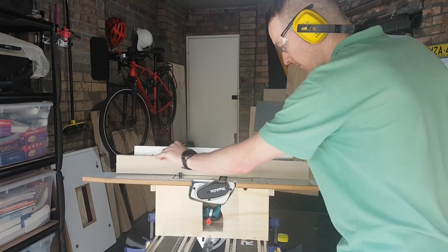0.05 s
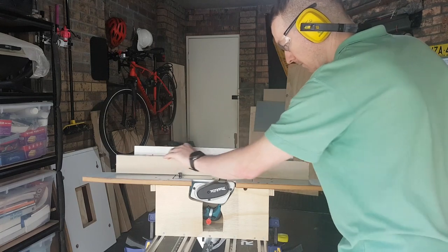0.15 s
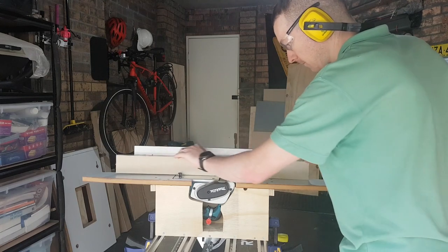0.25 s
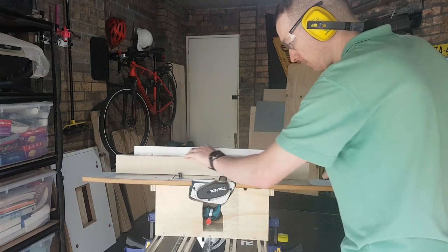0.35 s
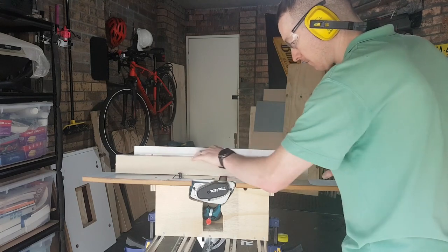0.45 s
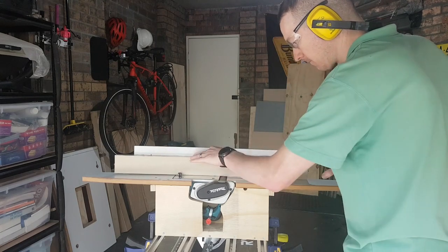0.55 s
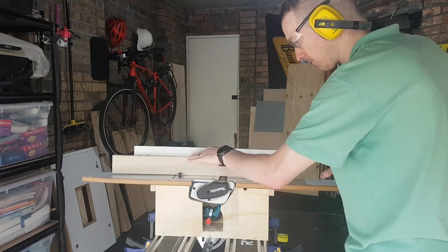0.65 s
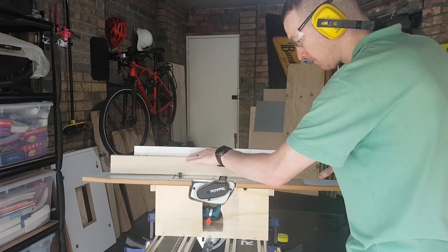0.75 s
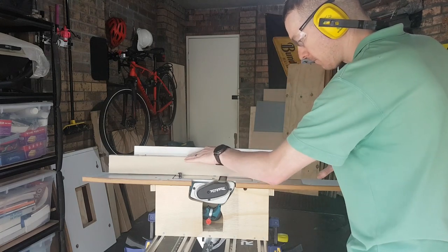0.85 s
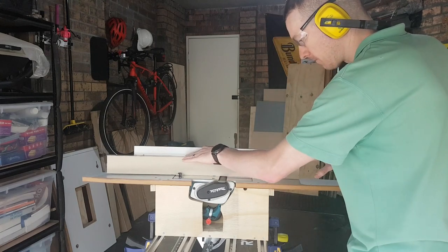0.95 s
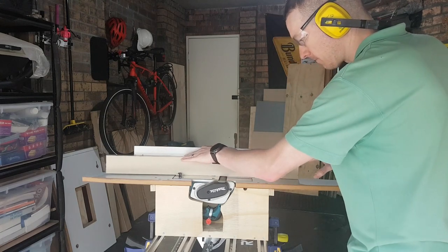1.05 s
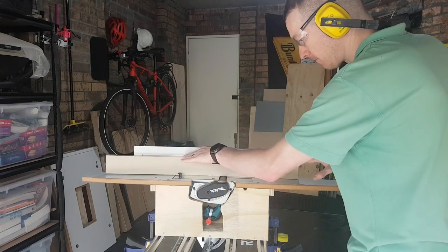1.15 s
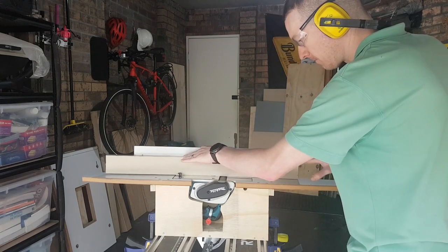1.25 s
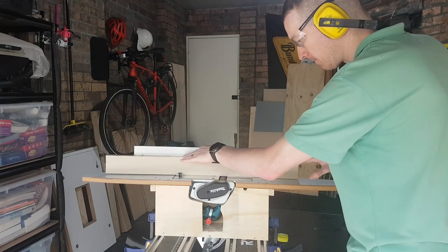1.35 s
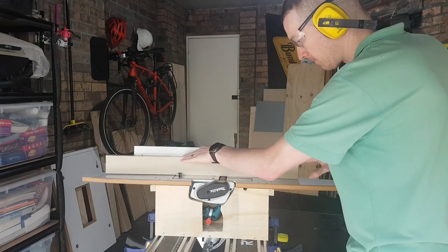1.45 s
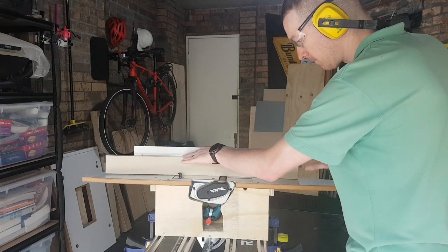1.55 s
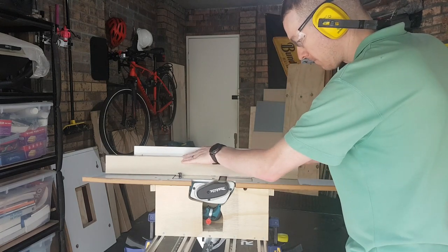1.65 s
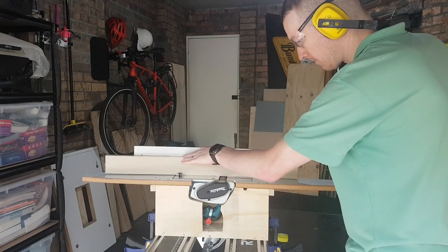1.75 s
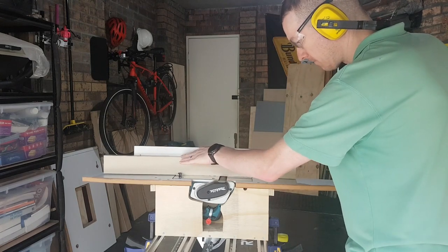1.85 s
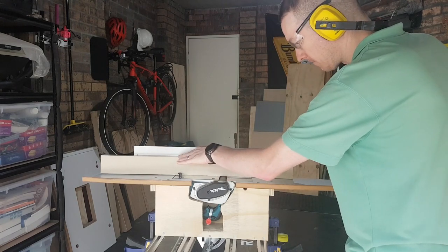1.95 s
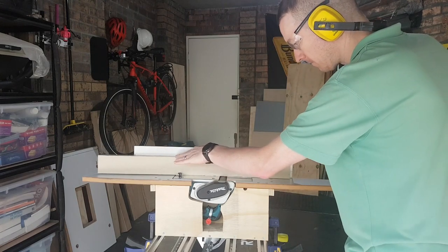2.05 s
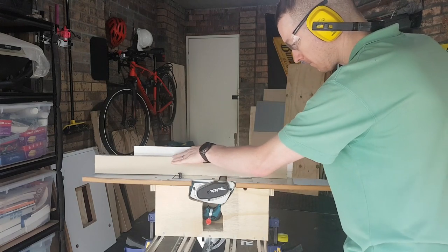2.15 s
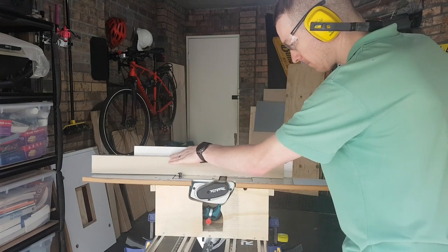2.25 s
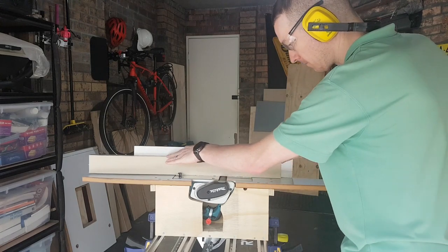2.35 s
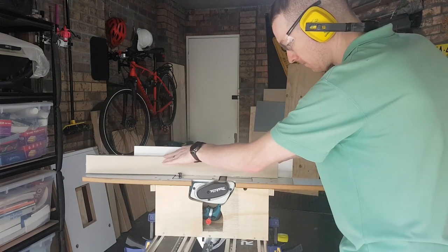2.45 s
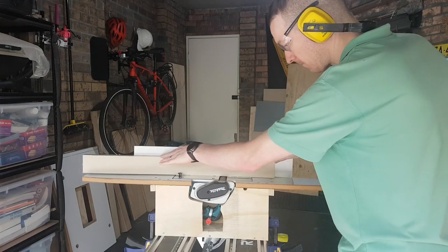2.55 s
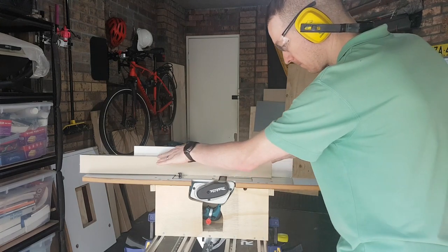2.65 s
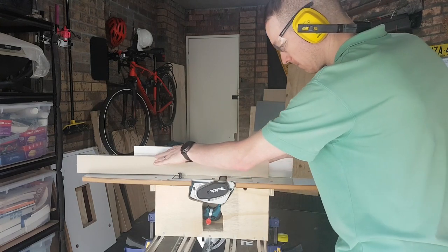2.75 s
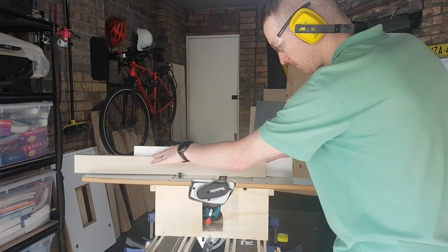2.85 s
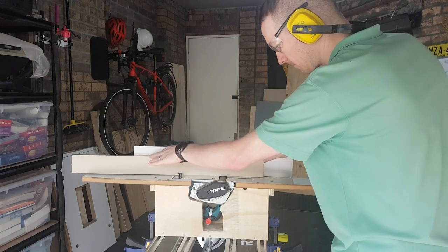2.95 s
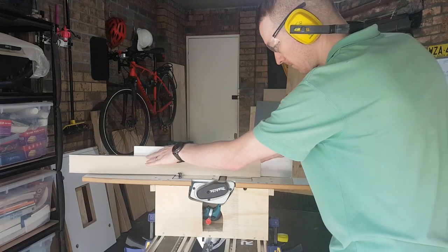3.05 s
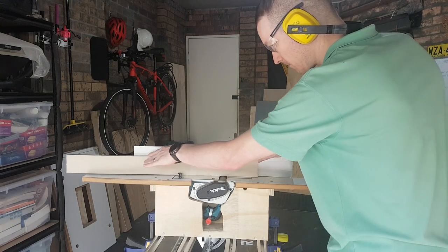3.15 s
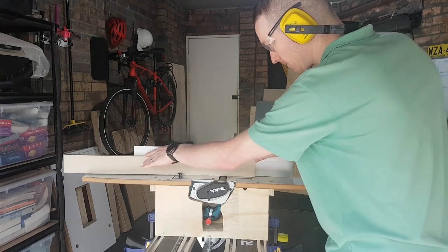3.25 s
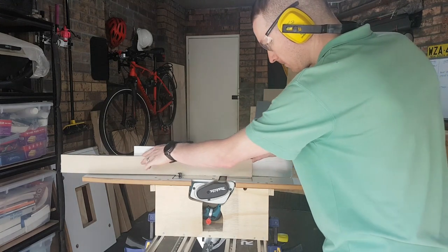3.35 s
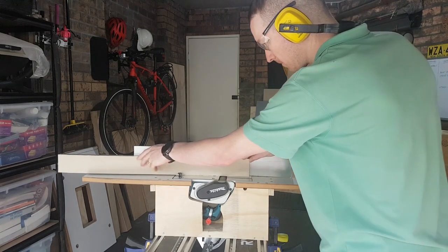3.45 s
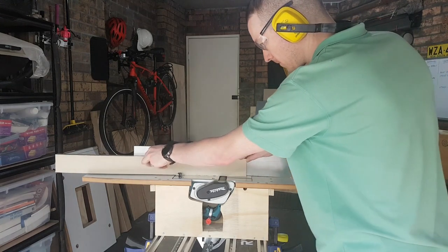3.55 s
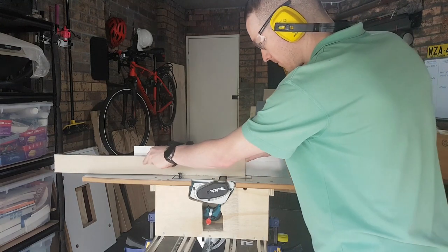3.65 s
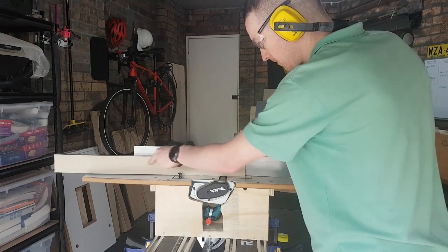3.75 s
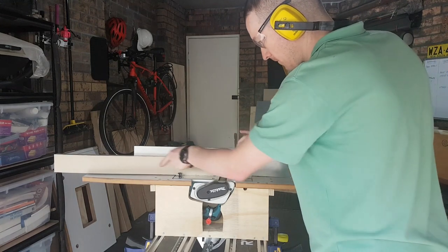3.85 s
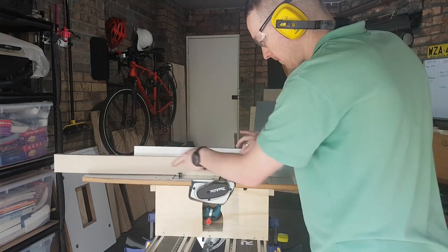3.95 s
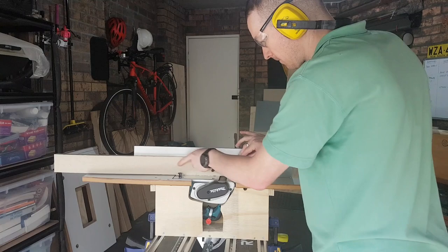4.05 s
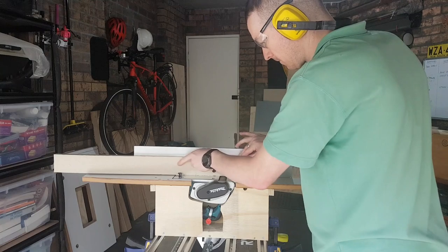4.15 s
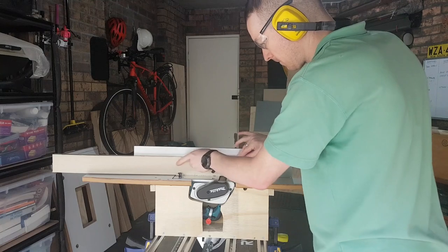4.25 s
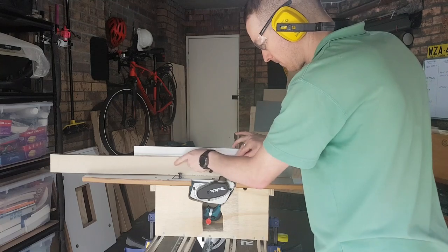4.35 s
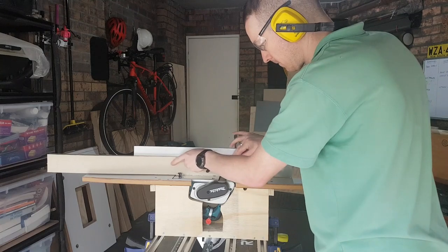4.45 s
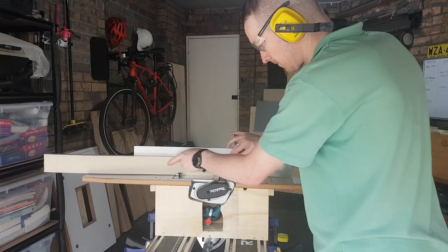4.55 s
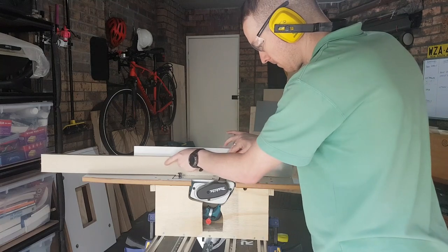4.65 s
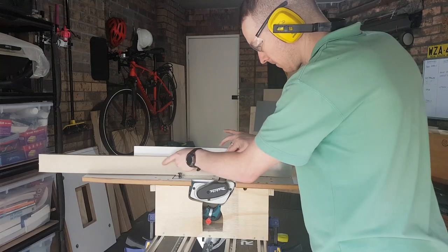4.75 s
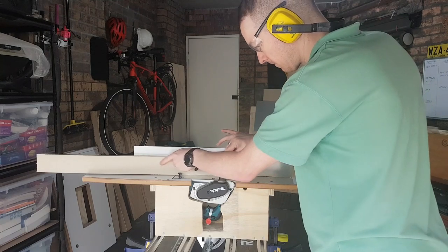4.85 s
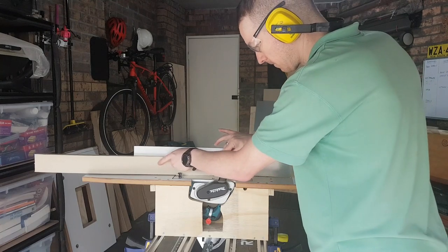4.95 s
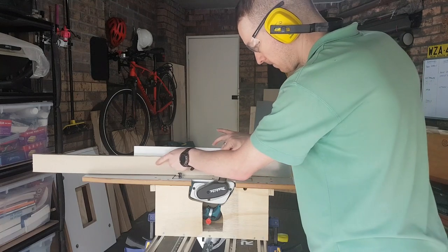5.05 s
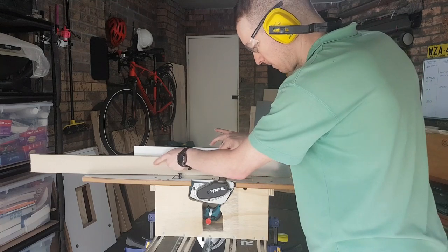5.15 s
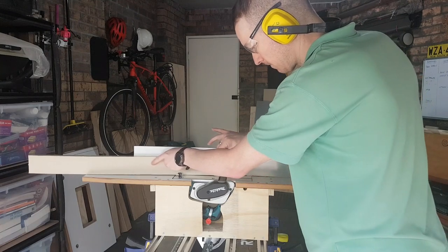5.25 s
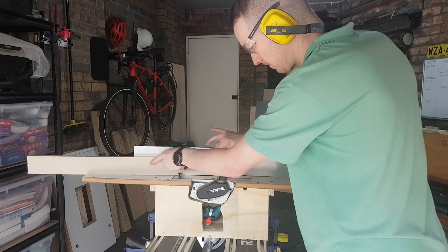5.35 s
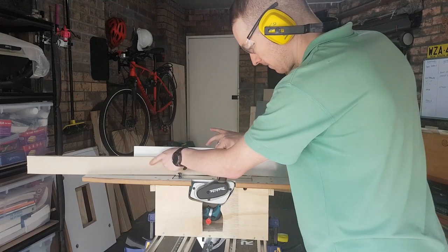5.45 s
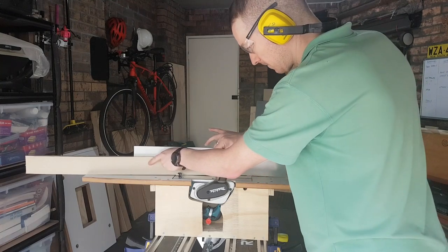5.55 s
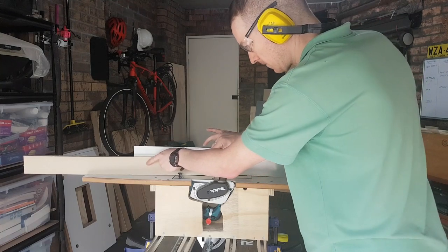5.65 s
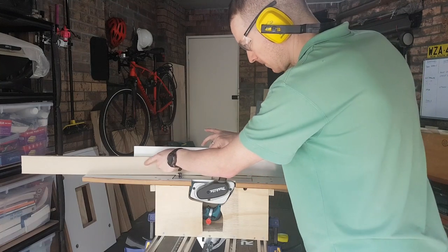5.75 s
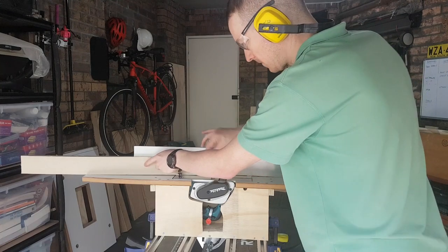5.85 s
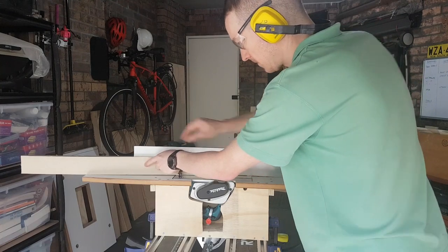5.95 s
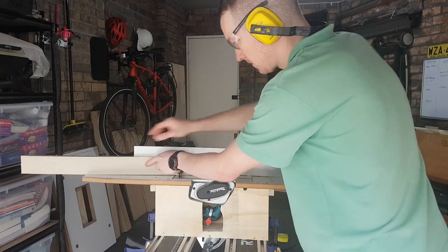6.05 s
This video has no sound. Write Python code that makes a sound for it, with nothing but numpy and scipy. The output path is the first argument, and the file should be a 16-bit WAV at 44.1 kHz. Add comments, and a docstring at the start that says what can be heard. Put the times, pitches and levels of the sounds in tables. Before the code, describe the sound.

Steady whine of an electric planer, dipping in pitch with a harsh shaving hiss each time its blades bite into wood.

```python
"""Cordless planer as a jointer

Mounted upside down in a small workshop, it takes a board in three strong pushes.
Two knives strike about 410 times a second: a drone in free air, a harsh rasp with flying chips in wood.
Over the fan's rush the motor whines and the belt hums; motor, belt and knives sag in pitch under load.
The moving board makes single overtones sing out, and two splinters snap off."""
import sys
import numpy as np
from scipy import signal
from scipy.fft import rfft, irfft, next_fast_len
from scipy.io import wavfile
from scipy.ndimage import uniform_filter1d, map_coordinates

SR = 44100
rng = np.random.default_rng(int(sys.argv[2]) if len(sys.argv) > 2 else 0)


def store_wav(level_fs):
    """Save 16-bit WAV to argv[1]."""
    pcm = np.round(np.clip(np.atleast_2d(level_fs), -1, 1) * 32767)
    wavfile.write(sys.argv[1], SR, pcm.T.astype(np.int16))


N = 269451
TIME_S = np.arange(N) / SR
TOP_HZ = 15700


def amp(db):
    return 10 ** (np.asarray(db) / 20)


def unit_rms(x):
    return x / np.sqrt(np.mean(x ** 2) + 1e-20)


def db_at(spectrum, hz):
    """Interpolate (f/Hz, level/dB) rows on a log frequency axis."""
    row_hz, row_db = np.transpose(spectrum)
    return np.interp(np.log(hz + 1), np.log(row_hz + 1), row_db)


def curves(rows):
    """One per-sample curve for each column after t/s."""
    row_s, *columns = np.transpose(rows)
    return [np.interp(TIME_S, row_s, column) for column in columns]


def wobble(rate_hz):
    """Smooth random curve, rms about 1, knots at rate_hz."""
    grid = np.arange(0, N + 64, 64)
    knots = rng.standard_normal(1024)
    coarse = map_coordinates(knots, [grid * rate_hz / SR], mode="mirror")
    return np.interp(np.arange(N), grid, coarse)


def filtered(x, response):
    """Zero-phase filter with gain response(hz)."""
    size = next_fast_len(N + SR // 2)
    return irfft(rfft(x, size) * response(np.fft.rfftfreq(size, 1 / SR)), size)[:N]


def rush(spectrum, patchy_db):
    """Coloured noise, rms 1, with random gain patches in time and frequency."""
    bins = signal.stft(rng.standard_normal(N), nperseg=512)[2]
    patches = uniform_filter1d(rng.standard_normal(bins.shape), size=6, axis=0)
    patches = uniform_filter1d(patches, size=12, axis=1)
    noise = signal.istft(bins * amp(patchy_db * unit_rms(patches)), nperseg=512)[1][:N]
    return unit_rms(filtered(noise, lambda hz: amp(db_at(spectrum, hz))))


def angle_rad(turn_hz):
    return 2 * np.pi * np.cumsum(turn_hz) / SR


def tone(phase, waver_db, rate_hz):
    """Sine, rms about 1, with wavering level."""
    return np.sqrt(2) * amp(waver_db * wobble(rate_hz)) * np.sin(phase + rng.uniform(0, 2 * np.pi))


def scattered(phase, wall_share, rate_hz):
    """Direct tone plus wall reflections that shift as board and arms move."""
    direct = np.sqrt(2 * (1 - wall_share)) * np.cos(phase)
    reflected = wobble(rate_hz) * np.cos(phase) + wobble(rate_hz) * np.sin(phase)
    return direct + np.sqrt(wall_share) * reflected


# Fan noise: f/Hz, relative density/dB
FAN_SPECTRUM = [(25, -39), (70, -25), (110, -13.5), (250, -11), (500, 2), (900, 0.5), (1500, -4.5),
                (2500, -6.5), (3600, -6), (5000, -15), (8500, -22.5), (11000, -27), (15000, -39)]
def fan():
    """Air driven through housing and chip port."""
    return amp(-47.5 + 0.4 * wobble(8)) * rush(FAN_SPECTRUM, patchy_db=1.3)


# Belt hum: t/s, level/dB
HUM_LEVEL = [(0.0, -37), (0.07, -41), (1.19, -39), (1.48, -45.5), (2.14, -38), (2.38, -44), (2.65, -38),
             (3.78, -39.5), (3.88, -42.5), (6.11, -40.5)]
# Faint belt and drum side tones: multiple of belt lap rate, full-load level/dB
SIDE_TONES = [(1, -73), (4.25, -56), (5.22, -59), (5.74, -50), (8.37, -59), (12.16, -62), (19.14, -60.5)]
def belt(lap_hz, motor_hz, load):
    """The belt hums, tugged once a turn by the motor pulley; faint side tones grow under load."""
    lap_rad = angle_rad(lap_hz)
    hum_db, = curves(HUM_LEVEL)
    hum = amp(hum_db) * tone(6 * lap_rad, waver_db=1.5, rate_hz=30)
    tug = 1 + 0.21 * np.cos(angle_rad(motor_hz))
    side_tones = sum(amp(db) * tone(k * lap_rad, waver_db=2.5, rate_hz=22) for k, db in SIDE_TONES)
    return hum * tug + amp(8.3 * (load - 1)) * side_tones


# Comb of weak motor lines: f/Hz, level per line/dB
BRUSH_SPECTRUM = [(600, -73), (2500, -73.5), (6000, -67), (9000, -78), (12000, -80), (15500, -88)]
def brushes(motor_hz):
    """The brushes tick in the same uneven pattern every turn."""
    orders = np.arange(52)
    line_db = db_at(BRUSH_SPECTRUM, orders * motor_hz.mean()) + rng.normal(0, 2, len(orders))
    lines = amp(line_db) * (orders > 1) * np.exp(2j * np.pi * rng.random(len(orders)))
    one_turn = irfft(lines, 4096, norm="forward") / np.sqrt(2)
    position = angle_rad(motor_hz) / (2 * np.pi) % 1
    buzz = np.interp(position, np.arange(len(one_turn)) / len(one_turn), one_turn)
    return amp(1.4 * wobble(12)) * buzz


# Rotor whine: t/s, level/dB
WHINE_LEVEL = [(0.0, -53), (0.07, -39.5), (0.2, -41), (0.3, -50), (0.95, -44), (1.3, -41), (1.95, -44),
               (2.1, -51), (2.5, -45), (3.25, -52), (3.85, -49.5), (3.95, -41), (4.1, -48.5), (4.45, -57),
               (4.72, -47), (5.25, -50), (5.5, -43.5), (6.1, -47.5)]
# Strong motor lines: multiple of turn rate, level/dB
MOTOR_LINES = [(1, -67), (7, -60), (11, -63.5), (16, -61), (19, -74), (24, -66), (29, -69), (30, -60.5)]
def motor(motor_hz, rotor_slots=12):
    """The slotted rotor whines among other harmonics of its turn rate."""
    motor_rad = angle_rad(motor_hz)
    whine_db, = curves(WHINE_LEVEL)
    whine = amp(whine_db) * tone(rotor_slots * motor_rad, waver_db=2.9, rate_hz=20)
    lines = sum(amp(db) * tone(round(k) * motor_rad, waver_db=2, rate_hz=16) for k, db in MOTOR_LINES)
    return whine + lines


# Drone fundamental: t/s, level/dB
CHOP_LEVEL = [(0.0, -44), (0.65, -39.5), (0.87, -41.5), (1.02, -38), (1.12, -40), (1.79, -39.5),
              (1.89, -37), (3.71, -38.5), (3.84, -43.5), (4.61, -37.5), (4.92, -39.5), (5.0, -45),
              (5.82, -41.5), (6.11, -42.5)]
# Drum turn rates, full load to free air: f/Hz
ROOM_DRUM_HZ = [202.1, 202.8, 204.5, 206, 208, 210]
# Drone in the room's standing waves, per ROOM_DRUM_HZ entry: harmonic 2 level/dB, harmonic 3 level/dB
ROOM_LEVELS = [(-61, -40.5), (-43.5, -43.5), (-40.5, -48), (-47.5, -43), (-43.5, -47), (-44.4, -43)]
# Upper drone in free air: harmonic, level/dB
AIR_HARMONICS = [(4, -60.5), (5, -49), (6, -63), (8, -57), (9, -55.5), (10, -71)]
def drone(drum_rad, drum_hz, load):
    """The knives chop the air twice a turn; drum unbalance throbs once a turn, more under load."""
    room_db = [np.interp(drum_hz, ROOM_DRUM_HZ, db) for db in np.transpose(ROOM_LEVELS)]
    chop = sum(amp(db) * tone(2 * k * drum_rad, waver_db=0.74, rate_hz=28)
               for k, db in enumerate(curves(CHOP_LEVEL) + room_db, 1))
    upper = sum(amp(db - 13 * load) * tone(2 * round(k) * drum_rad, waver_db=1, rate_hz=31)
                for k, db in AIR_HARMONICS)
    throb = amp(-64 + 9.9 * load ** 2) * tone(drum_rad, waver_db=0.9, rate_hz=4.2)
    return chop + upper + throb


# Pushes, and creep while the hands shift: start t/s, end t/s, force level/dB at start, middle, end
STROKES = [(-0.03, 0.174, -8, -10, -8), (0.196, 0.55, -24, -15, -7), (0.538, 1.106, 1, 0, -2),
           (1.114, 1.67, -11, -6.5, -9.5), (1.785, 3.692, -1.5, 0, -2.5), (3.72, 4.204, -6.5, -10.5, -13.5),
           (4.19, 5.104, -3.5, -0.5, 1.5)]
def feed_force(grip_s=0.046, release_s=0.024):
    """Board force on the knives, 1 = full push: each stroke digs in with a jolt, holds and lets go."""
    force = np.zeros(N)
    for start_s, end_s, start_db, mid_db, end_db in STROKES:
        age_s = np.maximum(TIME_S - start_s, 0)
        after_s = np.maximum(TIME_S - end_s, 0)
        hold_db = np.interp(TIME_S, [start_s, (start_s + end_s) / 2, end_s], [start_db, mid_db, end_db])
        jolt_db = 3.5 * amp(mid_db) * np.exp(-np.square((age_s - 0.08) / 0.091))
        contact = (1 - np.exp(-age_s / grip_s)) * np.exp(-after_s / release_s)
        force += amp(hold_db + jolt_db) * contact
    return force


# Splinter snaps: t/s, level/dB
SNAPS = [(3.376, -39), (5.098, -38.5)]
# Snap noise: f/Hz, relative density/dB
SNAP_SPECTRUM = [(200, -50), (1500, -16), (4000, -15), (6500, -6), (8100, 12), (9300, -13), (13000, -23),
                 (15500, -24)]
def splinters(rise_s=0.001, t60_s=0.16):
    """A splinter breaks with a bright tick that the walls draw out."""
    envelope = np.zeros(N)
    for start_s, db in SNAPS:
        age_s = np.maximum(TIME_S - start_s, 0)
        envelope += amp(db - 60 * age_s / t60_s) * (1 - np.exp(-age_s / rise_s))
    return envelope * rush(SNAP_SPECTRUM, patchy_db=2)


# Chip hiss: f/Hz, relative density/dB
CHIP_SPECTRUM = [(50, -42), (200, -34), (550, -16), (900, -1), (1300, 7), (2200, 2.5), (3300, -13),
                 (5000, 3), (6500, -12), (8200, 4.5), (10500, -13.5), (13000, -20), (15500, -25)]
def shavings(drum_rad, force, chips_db=-51, dust_db=-55.5):
    """Each blow tears off a chip, a puff of hiss smeared by the walls; dust hisses on in free air."""
    level = np.hypot(amp(chips_db) * force ** 0.56, amp(dust_db))
    puffs = ((1 + np.cos(2 * drum_rad)) / 2) ** 3
    blow_index = (drum_rad / np.pi + 0.5).astype(int)
    sizes = amp(2 * rng.standard_normal(N)[blow_index])
    clumps = amp(np.sqrt(force) * (0.8 * wobble(60) + 1.1 * wobble(14)))
    return level * unit_rms(clumps * (0.75 + puffs * sizes) * rush(CHIP_SPECTRUM, patchy_db=1.3))


# Board resonances: centre t/s, knife harmonic, duration/s, level/dB
BOARD_RINGS = [(0.628, 5, 0.13, -43), (0.844, 4, 0.19, -40), (0.88, 8, 0.26, -37.5),
               (1.813, 20, 0.074, -41.5), (1.914, 7, 0.11, -39.5), (2.247, 21, 0.25, -36),
               (2.526, 12, 0.65, -38.5), (2.546, 5, 0.66, -38), (2.905, 6, 0.83, -40.5),
               (2.852, 8, 0.6, -43), (3.12, 5, 0.31, -45.5), (3.36, 9, 0.64, -37), (4.307, 20, 0.25, -40.5),
               (4.65, 5, 0.6, -43.5), (4.8, 32, 0.18, -55), (4.8, 33, 0.2, -56), (4.852, 10, 0.46, -41),
               (4.97, 8, 0.41, -40.5), (4.995, 18, 0.24, -35), (5.006, 19, 0.24, -34.5)]
def board_power(harmonic):
    """Power over time of the board ringing on one knife harmonic."""
    return sum(amp(db) ** 2 * np.exp(-2 * (2 * (TIME_S - centre_s) / length_s) ** 4)
               for centre_s, k, length_s, db in BOARD_RINGS if round(k) == harmonic)


# Housing resonances and dead spots: f/Hz, width/Hz, gain/dB
HOUSING_BANDS = [(2450, 170, 2.5), (3280, 170, 1.5), (3640, 180, 3.5), (4430, 120, -4.5), (4836, 150, 3.5),
                 (5720, 100, 4), (6150, 160, -3.5), (6920, 130, -2), (10230, 150, 1.5), (11300, 340, -2.5)]
def housing_db(hz):
    """The housing lifts or damps narrow bands."""
    return sum(db * np.exp(-np.square((hz - centre_hz) / width_hz))
               for centre_hz, width_hz, db in HOUSING_BANDS)


# Knife blow colour: f/Hz, gain/dB
BLOW_SPECTRUM = [(1600, 3.5), (2400, 3), (3200, 4.5), (4000, 3), (4900, 1.2), (5700, -3), (6900, 1.5),
                 (8100, 6.5), (9300, 10), (10500, 5.5), (13000, 2.5), (15000, -4)]
# Resonance of the slot under the board: t/s, f/Hz, level before force scaling/dB
SLOT_RESONANCE = [(0.08, 8570, -39.5), (0.4, 7900, -42.5), (1.0, 8050, -78), (1.5, 8300, -55.5),
                  (2.4, 8800, -44.5), (2.9, 8350, -50), (3.55, 7950, -41.5), (4.15, 8280, -43),
                  (4.7, 7440, -44.5), (5.1, 7650, -44)]
def knives(drum_rad, force, slot_width_hz=250):
    """Sharp blows on wood make a stack of harmonics; slot and board ring on single ones."""
    force_db = 20 * np.log10(force + amp(-28.5))
    dull_db = -52.5 + 0.72 * force_db
    edge_db = -67 + 0.88 * force_db
    slot_hz, slot_db = curves(SLOT_RESONANCE)
    slot_level = amp(slot_db + 0.41 * force_db) * force / (force + 0.089)
    mean_blow_hz = drum_rad[-1] / np.pi / TIME_S[-1]
    blow_rad = 2 * drum_rad + 0.011 * wobble(90)  # grain jitters the timing
    rasp = np.zeros(N)
    for k in range(4, int(TOP_HZ / mean_blow_hz) + 1):
        if k % 4 == 0:  # four neighbours flare with the grain and flutter as chips break
            flare = amp(wobble(20) + 1.2 * wobble(60) - 0.4)
        hz = k * mean_blow_hz
        edge_share = np.clip((hz - 5700) / 4900, 0, 1)
        cut_db = (1 - edge_share) * dull_db + edge_share * edge_db
        swell_db = 2.5 * wobble(0.3325 * k)  # the board slides
        level = amp(cut_db + db_at(BLOW_SPECTRUM, hz) + housing_db(hz) + swell_db)
        phase = k * blow_rad + rng.normal(0, 0.79)
        harmonic = scattered(phase, wall_share=0.2, rate_hz=16)
        between = amp(-15) * tone(phase + drum_rad, waver_db=3, rate_hz=7)  # one knife stands prouder
        slot_power = slot_level ** 2 * np.exp(-np.square((hz - slot_hz) / slot_width_hz))
        singing = np.sqrt(2 * (slot_power + board_power(k))) * np.sin(phase)  # resonance lags 90 deg
        rasp += flare * level * (harmonic + between) + np.sqrt(flare) * singing
    return rasp


# Cutter drum turn rate: t/s, f/Hz
DRUM_SPEED = [(0.0, 205.43), (0.24, 207.83), (0.51, 208.36), (0.73, 204.25), (1.03, 202.75), (1.29, 206.0),
              (1.82, 207.9), (1.98, 204.47), (2.29, 201.96), (2.94, 202.85), (3.12, 202.39), (3.67, 202.87),
              (3.85, 205.15), (4.18, 207.2), (4.41, 203.61), (4.64, 202.19), (4.92, 203.44), (5.29, 208.92),
              (5.53, 209.87), (6.1, 210.01)]
def scene():
    """Drum speed sets the machine's pitch; feed force sets the strength of the cut."""
    steady_hz, = curves(DRUM_SPEED)
    load = (steady_hz.max() - steady_hz) / np.ptp(steady_hz)  # the drum slows as the knives bite
    drum_hz = steady_hz * (1 + 0.000272 * wobble(16))
    drum_rad = angle_rad(drum_hz)
    motor_hz = drum_hz * (1.357 + 0.0032 * load)  # runs ahead as the belt creeps
    lap_hz = drum_hz * (0.5739 + 0.001 * load)
    force = feed_force()
    machine = drone(drum_rad, steady_hz, load) + motor(motor_hz) + brushes(motor_hz)
    machine += belt(lap_hz, motor_hz, load) + fan()
    cut = knives(drum_rad, force) + shavings(drum_rad, force) + splinters()
    return (machine + cut)[None]


def record(dry):
    """Brick-wall low-pass at TOP_HZ."""
    return filtered(dry[0], lambda hz: hz < TOP_HZ)[None]


dry = scene()
out = record(dry)
store_wav(out)
```